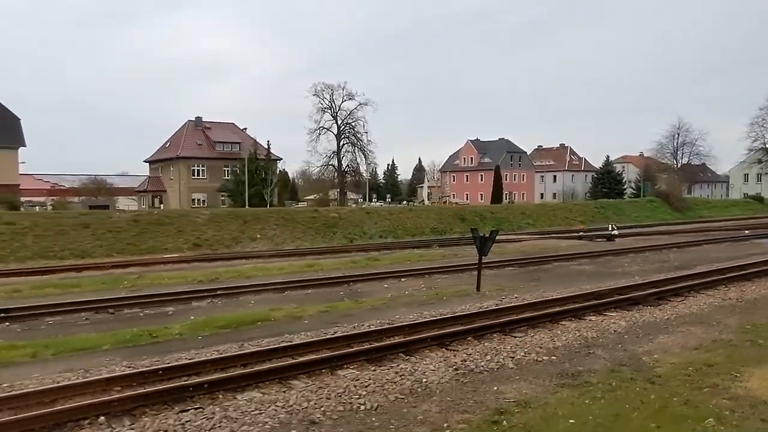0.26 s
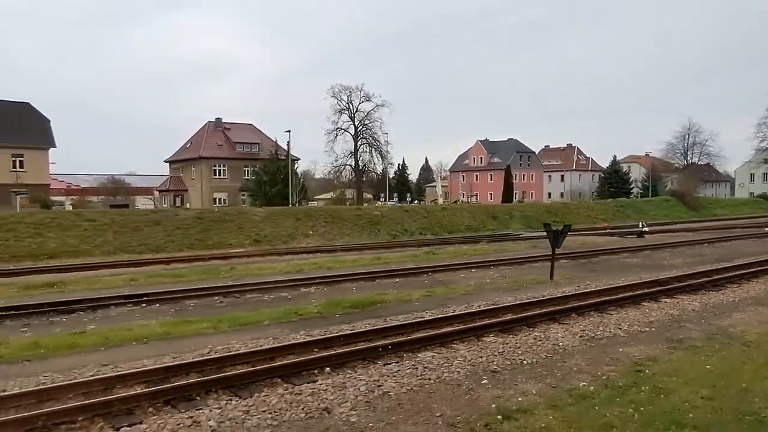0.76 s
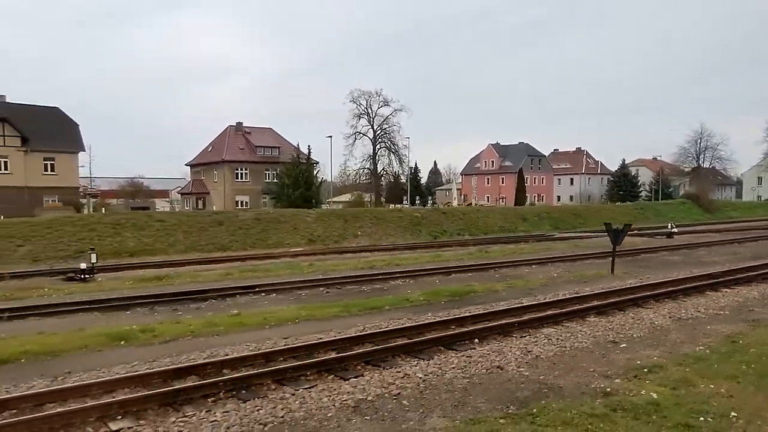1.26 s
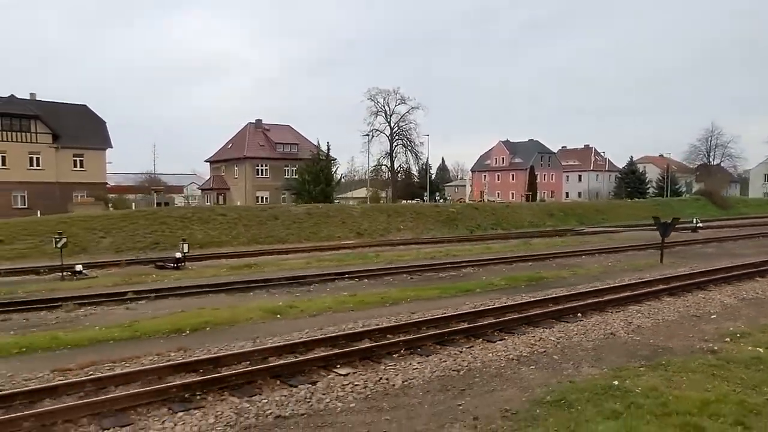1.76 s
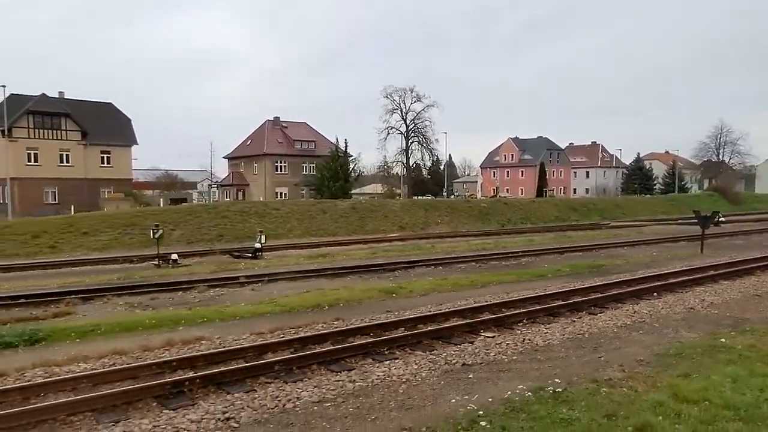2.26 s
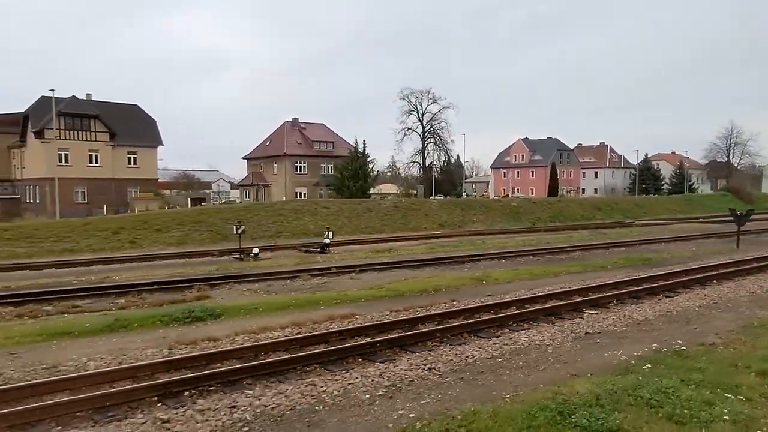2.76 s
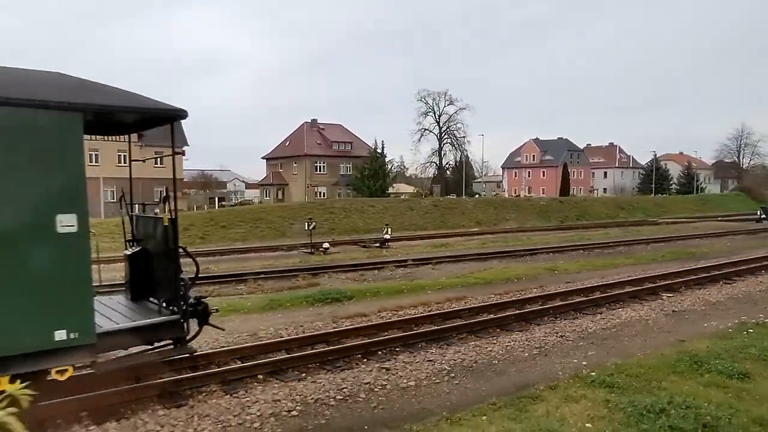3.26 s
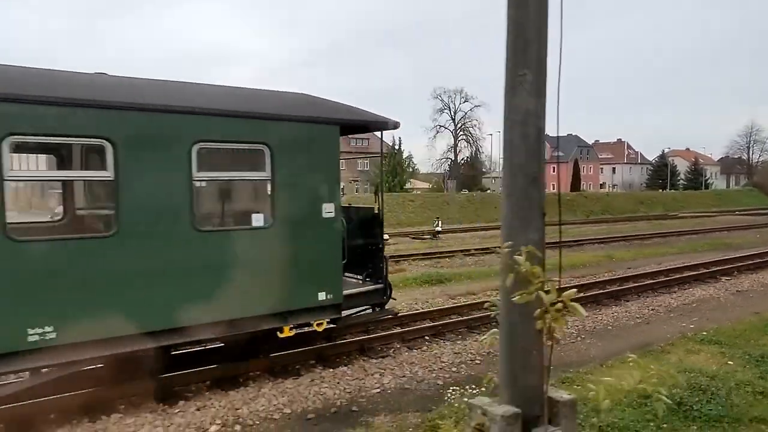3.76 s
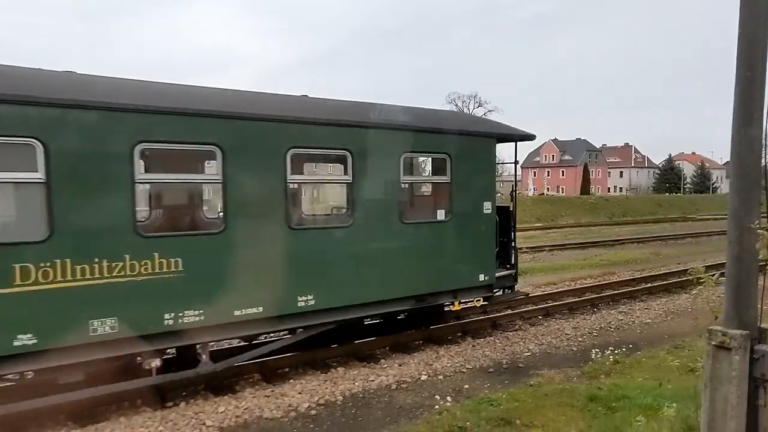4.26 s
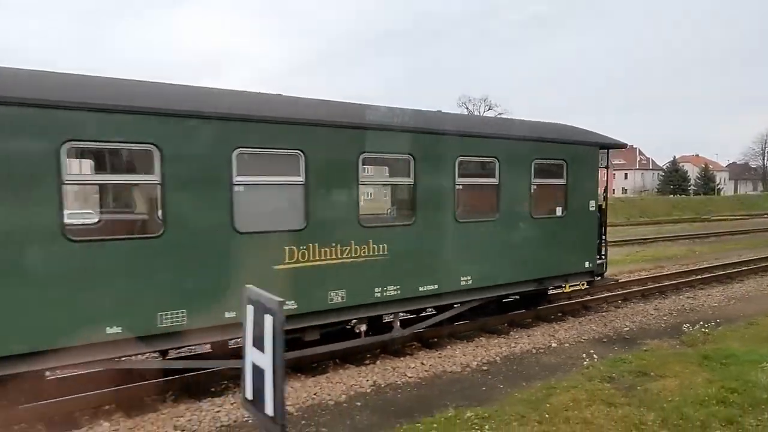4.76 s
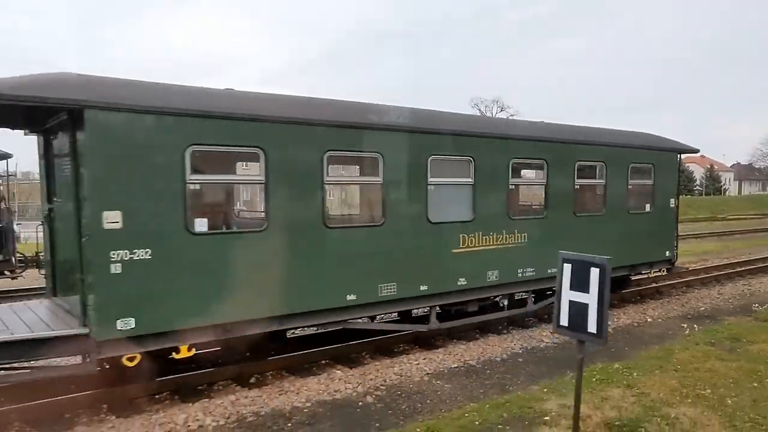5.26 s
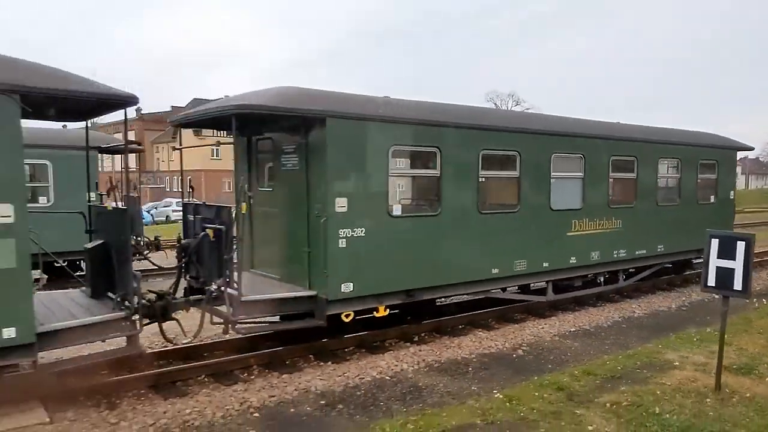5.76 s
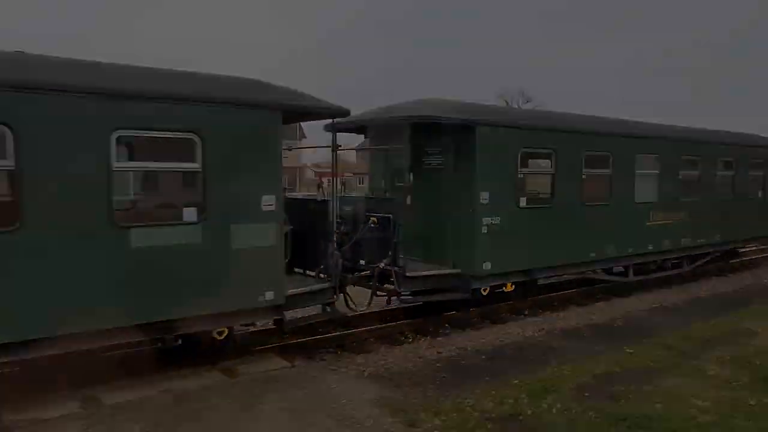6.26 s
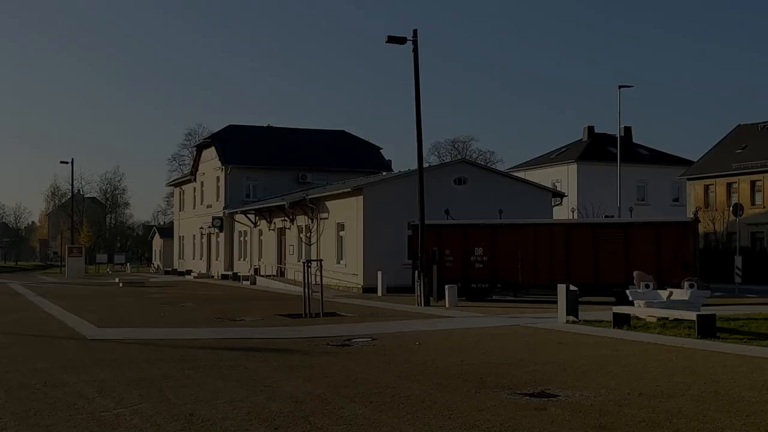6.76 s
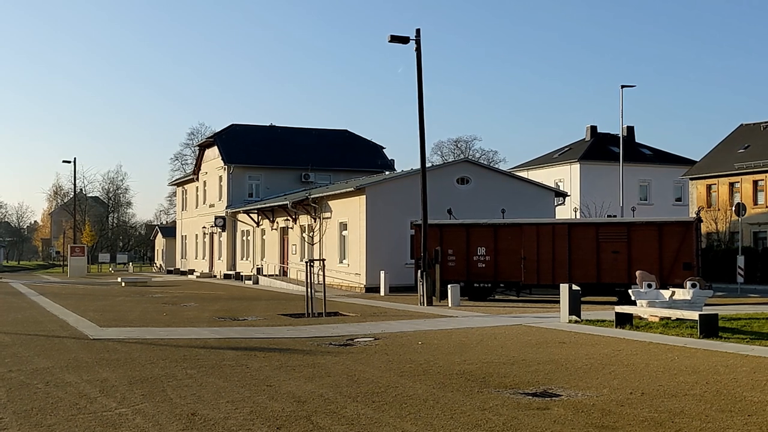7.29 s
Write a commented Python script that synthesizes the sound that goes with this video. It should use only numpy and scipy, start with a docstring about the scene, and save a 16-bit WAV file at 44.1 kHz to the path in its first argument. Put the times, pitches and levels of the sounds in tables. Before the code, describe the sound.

Inside a rolling diesel railcar, an uneven low boom and dull thuds mix with clacking rail joints, then fade into a quiet open square.

```python
"""A booming diesel railcar interior, rolling through a station: uneven low boom, thuds, rail joints clacking.
Boom and rolling are shaped noise; thuds are enveloped sine pairs with floor noise; gears whine as unsteady sines.
Joints ring decaying steel and panel modes, with noise bursts for clack, sizzle and floor knock.
At the end the ride fades out; a quiet open-air square with far traffic, rising underneath, remains."""
import sys
import numpy as np
from scipy.fft import rfft, irfft, next_fast_len
from scipy.io import wavfile
from scipy.ndimage import uniform_filter1d, map_coordinates

SR = 44100
rng = np.random.default_rng(int(sys.argv[2]) if len(sys.argv) > 2 else 0)


def unload_wav(signal):
    """Save mono or channel-first audio to the path in sys.argv[1] as 16-bit WAV at rate SR, clipped to [-1, 1]."""
    wavfile.write(
        sys.argv[1],
        SR,
        np.round(np.clip(np.atleast_2d(signal).T, -1, 1) * 32767).astype(np.int16),
    )


N = 332059


def amp(db):
    """Amplitude ratio of a level in dB."""
    return 10 ** (np.asarray(db) / 20)


def unit(x):
    """x scaled to rms 1."""
    return x / np.sqrt(np.mean(x ** 2) + 1e-20)


def along(points, hz):
    """Interpolate (frequency [Hz], value) points on a log-frequency axis."""
    f, v = np.transpose(points)
    return np.interp(np.log(hz + 1), np.log(f + 1), v)


def curves(rows):
    """One value per sample for each column after the time."""
    s, *cols = np.transpose(rows)
    return [np.interp(np.arange(N) / SR, s, c) for c in cols]


def wobble(knots_per_s):
    """A smooth random curve through normally distributed knots."""
    knots = rng.standard_normal(int(N * knots_per_s / SR) + 4)
    return map_coordinates(knots, [np.arange(N) * knots_per_s / SR])


def sine(hz):
    """Sine of a frequency that varies sample by sample."""
    return np.sin(2 * np.pi * np.cumsum(hz) / SR)


def ringing(hz, t):
    """Sine of steady frequency and random phase."""
    return np.sin(2 * np.pi * (hz * t + rng.random()))


def filtered(x, response):
    """x times a complex response of frequency."""
    m = next_fast_len(N + SR // 2)
    return irfft(rfft(x, m) * response(np.fft.rfftfreq(m, 1 / SR)), m)[..., :N]


def colour(points):
    """Gain response of a spectrum table."""
    return lambda hz: amp(along(points, hz))


def modes(table):
    """Gain response of a set of resonances, powers added."""
    def response(f):
        return np.sqrt(sum(amp(2 * db) * (f * width) ** 2 / ((hz * hz - f * f) ** 2 + (f * width) ** 2)
                           for hz, width, db in table))
    return response


# Left-right likeness of diffuse sound: (frequency [Hz], correlation [0-1])
LIKENESS = [(60, 1), (180, 0.97), (350, 0.83), (700, 0.21), (1400, 0.025), (4000, 0.18), (12000, 0.016)]


def rush(response):
    """Stereo noise of rms 1: near mono in the bass, partly alike above."""
    def mid_side(hz):
        turn = np.arccos(np.clip(along(LIKENESS, hz), -1, 1)) / 2
        return response(hz) * [np.cos(turn), np.sin(turn)]
    mid, side = filtered(rng.standard_normal((2, N)), mid_side)
    return unit(np.array([mid + side, mid - side]))


def blow(t, rise_s, t60_s):
    """Envelope that rises softly from t = 0 and dies away exponentially."""
    t = np.maximum(t, 0)
    return amp(-60 * t / t60_s) * (1 - np.exp(-(t / rise_s) ** 2))


# Body resonances, response applied twice: (frequency [Hz], single-pass width [Hz], single-pass level [dB])
LOW_BODY_MODES = [(45.7, 18, -21), (59.4, 7.8, -11.5), (80.9, 9.5, -3.5)]
# Same columns: (frequency [Hz], single-pass width [Hz], single-pass level [dB])
HIGH_BODY_MODES = [(129.2, 13, 0), (154.3, 38, -5)]
# Surging boom, before thuds and fade: (time [s], low boom level [dB], high boom level [dB])
BOOM_LEVELS = [(0, -32, -28.5), (.07, -27.5, -29.5), (.12, -28, -33.5), (.17, -28.5, -30), (.22, -45, -26),
               (.28, -35, -34.5), (.33, -26.5, -26), (.65, -28, -28), (.8, -28.5, -33.5),
               (.87, -29.5, -28.5), (1.1, -27.5, -28.5), (1.2, -33.5, -31.5), (1.28, -34.5, -26),
               (1.36, -36.5, -37.5), (1.42, -26, -24), (1.64, -28.5, -37), (1.79, -35.5, -31),
               (1.89, -29.5, -26), (1.95, -32, -39), (2.08, -25, -25), (2.17, -27, -32.5),
               (2.3, -25.5, -33), (2.42, -23.5, -21.5), (2.52, -31.5, -32.5), (2.7, -22, -24),
               (2.84, -30, -29.5), (2.91, -35.5, -37.5), (3.05, -26, -29.5), (3.13, -43, -31.5),
               (3.18, -33, -24), (3.26, -24, -35.5), (3.35, -35.5, -29.5), (3.55, -28, -30),
               (3.7, -26.5, -26), (3.78, -23.5, -39), (3.92, -20.5, -21.5), (4.06, -34.5, -33),
               (4.13, -27, -28.5), (4.33, -24.5, -27.5), (4.44, -42.5, -31.5), (4.59, -29, -30),
               (4.75, -24, -26.5), (4.95, -32, -26), (5.08, -25, -28.5), (5.23, -25, -30.5),
               (5.37, -25.5, -31), (5.5, -25.5, -29), (5.67, -36, -39), (5.75, -30.5, -29.5),
               (5.95, -22.5, -27.5), (6.2, -23, -31), (6.26, -28.5, -30), (6.32, -26, -35), (6.6, -31, -32),
               (6.9, -26, -27), (7.1, -32, -41)]
SWELL_DB, SWELLS_PER_S = 2.5, 18


def body_mode(table, level_db, steady):
    """Resonant noise heaving at random; the engine's drive evens out its own swells by the share steady."""
    hum = rush(lambda f: modes(table)(f) ** 2)
    swell = np.sqrt(np.abs(uniform_filter1d(hum.mean(0) ** 2, size=1500)) + .01)
    heave = unit(amp(SWELL_DB * wobble(SWELLS_PER_S)))
    return amp(level_db) * heave * unit(hum / swell ** steady)


def boom():
    """The body booms in a low and a high group of modes."""
    low_db, high_db = curves(BOOM_LEVELS)
    return body_mode(LOW_BODY_MODES, low_db, steady=1.0) + body_mode(HIGH_BODY_MODES, high_db, steady=0.54)


# Thuds of both body modes; levels scale the shape below:
# (time [s], low level [dB], low pitch [Hz], high level [dB], high pitch [Hz], length constant [s])
THUD_BLOWS = [(1.131, -14.5, 79, -14.5, 131, 0.033), (1.232, -24, 80, -26, 137.7, 0.093),
              (1.672, -25.5, 80, -20, 128.2, 0.057), (2.081, -30, 70, -15.5, 129.5, 0.034),
              (2.188, -19, 83.2, -35, 124, 0.11), (2.364, -19, 77, -12.5, 132, 0.035),
              (2.61, -18, 76.8, -24.5, 131.5, 0.1), (2.731, -14, 78.2, -18.5, 133.8, 0.043),
              (2.944, -14, 74.7, -20, 141, 0.041), (3.802, -21, 71.7, -16.5, 127.9, 0.14),
              (3.956, -17.5, 71.8, -28, 136.6, 0.067), (4.184, -18, 79, -10.5, 133.4, 0.063),
              (4.244, -20, 77.8, -26.5, 126.3, 0.097), (4.492, -20, 76.7, -25.5, 136.6, 0.072),
              (4.617, -11, 65.5, -7.5, 131.8, 0.056), (4.851, -16, 80.8, -33, 129.3, 0.073),
              (4.984, -13.5, 62, -10, 129, 0.054), (5.095, -10.5, 70.5, -19, 132, 0.038),
              (5.58, -16, 74.4, -29, 125, 0.05)]
# Floor knock spectrum: (frequency [Hz], relative density [dB per Hz])
KNOCK_SPECTRUM = [(130, -21.5), (185, 10.5), (230, 10), (320, -8), (550, -3.5), (900, -15.5), (1500, -59.5)]
THUD_RISE_S, THUD_EDGE = .025, 2.86  # edge: how abruptly a thud ends
THUD_SHAKE_DB = -16  # floor noise re high mode
TAKEOVER = 0.38  # share of the boom driven out at a thud's peak


def thuds():
    """Two body modes swell and drop away, alike in both channels, with stereo floor noise; also the boom's gain."""
    out, shake = np.zeros((2, N + SR))
    boom_gain = np.ones(N + SR)
    t = np.arange(SR // 2) / SR
    for s, low_db, low_hz, high_db, high_hz, length_s in THUD_BLOWS:
        shape = (1 - np.exp(-(t / THUD_RISE_S) ** 2)) * np.exp(-(t / length_s) ** THUD_EDGE)
        at = slice(round(s * SR), round(s * SR) + len(t))
        swing = amp(low_db) * ringing(low_hz, t) + amp(high_db) * ringing(high_hz, t)
        out[at] += np.sqrt(2) * shape * swing
        shake[at] += amp(high_db + THUD_SHAKE_DB) * shape
        boom_gain[at] *= 1 - TAKEOVER * shape / shape.max()
    return out[:N] + shake[:N] * rush(colour(KNOCK_SPECTRUM)), boom_gain[:N]


# Rolling spectrum before the cut below about 180 Hz: (frequency [Hz], relative density [dB per Hz])
ROLLING_SPECTRUM = [(15, -62.5), (25, -34.5), (36, -7.5), (69, 7.5), (132, 2.5), (199, -13.5), (431, -27.5),
                    (549, -24.5), (666, -32.5), (808, -23.5), (957, -40), (1370, -32.5), (1550, -42.5),
                    (4820, -49.5), (8000, -68), (10400, -106), (17600, -120)]
# Treble hiss spectrum: (frequency [Hz], relative density [dB per Hz])
HISS_SPECTRUM = [(2940, -37), (5000, -14), (7900, -15), (9610, -21), (10200, -28), (13900, -14.5),
                 (15600, -30)]
# Body panel resonances: (frequency [Hz], free-ringing width [Hz], relative level [dB])
PANEL_MODES = [(220.6, 2, -0.5), (254, 13, -15), (355.6, 5.6, -4), (425.2, 6.9, -6.5), (559, 5.7, -3.5),
               (817, 14, -5.5), (1217, 13, -17), (1436, 34, -12.5), (1900, 83, -11), (2290, 53, -14)]
# Nearly even rolling and a coming and going treble hiss, before wobble and fade:
# (time [s], rolling level [dB], treble hiss level [dB])
RIDE_LEVELS = [(0, -30.5, -102), (.7, -33, -71.5), (1.35, -31, -72.5), (1.6, -30.5, -94.5),
               (2.3, -30, -66.5), (3.05, -30, -62), (3.55, -30, -83), (4.1, -29.5, -75.5),
               (4.42, -28, -58.5), (4.9, -30, -65.5), (5.4, -29.5, -101), (6.0, -29.5, -91),
               (6.5, -28.5, -63), (7.1, -29.5, -59)]
PANEL_SMEAR_HZ = 14  # width added by shaking


def rolling():
    """Rough wheels on rough rail make noise and ring the panels; faint unsteady treble hiss lies over them."""
    roll_db, hiss_db = curves(RIDE_LEVELS)

    def bed_response(hz):
        bass_cut_db = -13 / (1 + (hz / 180) ** 6)  # leaves room for the boom
        return colour(ROLLING_SPECTRUM)(hz) * amp(bass_cut_db)
    out = rush(bed_response) * amp(roll_db + 1.45 * wobble(7))
    for hz, width_hz, db in PANEL_MODES:
        panel = rush(modes([(hz, width_hz + PANEL_SMEAR_HZ, db)]))
        out += panel * amp(roll_db - 19.5 + db + 7.0 * np.tanh(wobble(9)))
    unsteady_db = 8 * np.tanh(wobble(9)) + 3 * np.tanh(wobble(40))
    return out + rush(colour(HISS_SPECTRUM)) * amp(hiss_db + unsteady_db)


# Rail joints and rattles; levels before envelope and pan:
# (time [s], clack level [dB], sizzle level [dB], low ring level [dB], low ring centre [Hz],
#  high ring level [dB], high ring centre [Hz], knock level [dB], knock centre [Hz],
#  rise constant [s], t60 [s], left-right difference [dB])
JOINT_BLOWS = [(0.634, -45.5, -74, -51, 1840, -63, 5060, -46, 231, 0.0056, 0.5, 4.5),
               (0.9917, -46, -71.5, -45, 1900, -67, 5900, -39, 353, 0.0053, 0.38, 1.5),
               (1.628, -51, -57, -55.5, 3150, -59, 6250, -40, 240, 0.017, 0.66, -3.5),
               (1.6812, -39, -37, -34.5, 3180, -41.5, 5120, -25.5, 243, 0.0045, 0.24, 0),
               (1.699, -54, -54, -39.5, 2300, -53.5, 6230, -44, 560, 0.0037, 0.38, 2.5),
               (2.0007, -54, -85, -47.5, 2870, -80, 5260, -50, 506, 0.0042, 0.17, -6.5),
               (2.2442, -44.5, -44, -46.5, 3140, -54.5, 5170, -39.5, 231, 0.012, 0.65, 1),
               (2.3069, -40.5, -37, -34.5, 3450, -45, 6500, -28, 268, 0.0062, 0.24, -2),
               (2.398, -60, -43, -43, 3170, -50.5, 6800, -39, 258, 0.0041, 0.23, -0.5),
               (2.601, -37.5, -32.5, -35.5, 3190, -34, 5900, -27, 258, 0.016, 0.2, 0),
               (2.632, -45, -52.5, -44, 2300, -45, 6050, -44, 258, 0.006, 0.21, -2.5),
               (2.756, -45, -50, -54, 3130, -69, 5300, -33, 232, 0.0057, 0.36, 0.5),
               (2.776, -45, -44, -43, 1900, -43, 9030, -37, 234, 0.0081, 0.24, -2.5),
               (3.1455, -47, -73, -45, 1890, -61, 5100, -33.5, 365, 0.0015, 0.32, 2.5),
               (3.7881, -40, -69.5, -53, 2380, -55, 5350, -38, 360, 0.0036, 0.25, -2.5),
               (3.808, -47, -71.5, -56, 2270, -66, 5100, -34.5, 581, 0.0029, 0.34, -7),
               (4.052, -49, -58, -69, 2340, -67, 5350, -43, 228, 0.0067, 0.51, 0),
               (4.1614, -39.5, -58, -40, 2450, -52.5, 6600, -32.5, 585, 0.008, 0.31, -14.5),
               (4.598, -43, -70, -57.5, 2730, -67.5, 5330, -28, 541, 0.0059, 0.3, -1),
               (4.9746, -41, -66, -62.5, 2300, -55, 4940, -27.5, 433.5, 0.012, 0.35, -4),
               (5.6452, -50, -55.5, -57, 2100, -65, 5230, -40, 792, 0.0065, 0.46, -2.5),
               (6.485, -56, -59, -58.5, 2300, -68, 5120, -55, 560, 0.015, 0.7, -4)]
# Modes of wheel and frame: (nominal frequency [Hz], relative level [dB])
STEEL_MODES = [(1900, 1.5), (2300, -1.5), (2870, 1), (3150, 3.5), (3330, 1), (3450, 3.5), (5120, 6),
               (5930, -2.5), (6250, -2.5), (6600, 9), (8600, 1), (9070, 4), (9500, 1.5), (11900, 3),
               (13000, -4), (14000, -3)]
# Clack spectrum: (frequency [Hz], relative density [dB per Hz])
CLACK_SPECTRUM = [(530, -39), (900, 4.5), (2680, 1.5), (3420, -9.5), (3750, -1), (6410, -10), (8500, -18.5),
                  (11000, -43), (18700, -120)]
# Sizzle spectrum: (frequency [Hz], relative density [dB per Hz])
SIZZLE_SPECTRUM = [(3530, -21.5), (6000, -4.5), (7750, -9), (9660, -10.5), (10900, -12.5), (11900, -5),
                   (13800, -10), (15600, -12.5)]
FLOOR_DB, FLOOR_RISE_S, FLOOR_T60_S = 5, 0.0078, 0.11  # level re knock
PANELS_RING_DB = 8  # re knock
PANEL_DB_PER_OCTAVE, PANEL_FAR_DB = 19, 19  # loss away from the knock centre, and its limit
STEEL_DB_PER_OCTAVE, STEEL_FAR_DB = 75.5, 13.5  # loss away from the ring centre, and its limit
STEEL_SCATTER = .002  # relative detuning per blow, standard deviation


def distance_db(hz, centre_hz, db_per_octave, limit_db):
    """A mode weakens with its distance in pitch from the struck part."""
    return -min(limit_db, db_per_octave * abs(np.log2(hz / centre_hz)))


def panel_ring(t, knock_db, knock_hz, dying):
    """The low panels ring freely, dying as their width allows."""
    out = np.zeros((2, len(t)))
    for hz, width_hz, db in PANEL_MODES[:6]:
        near_db = distance_db(hz, knock_hz, PANEL_DB_PER_OCTAVE, PANEL_FAR_DB)
        swing = np.exp(-np.pi * width_hz * t) * dying
        out += amp(knock_db + PANELS_RING_DB + db + near_db) * swing * ringing(hz, t)
    return out


def steel_ring(t, low_db, low_hz, high_db, high_hz, dying):
    """Detuned steel modes ring, smeared by loose parts that keep exciting them."""
    out = np.zeros((2, len(t)))
    for hz, db in STEEL_MODES:
        rattle = .6 + .75 * unit(uniform_filter1d(rng.standard_normal((2, len(t))), size=120))
        ring_db, centre_hz = (low_db, low_hz) if hz < 4500 else (high_db, high_hz)
        near_db = distance_db(hz, centre_hz, STEEL_DB_PER_OCTAVE, STEEL_FAR_DB)
        detuned_hz = hz * rng.normal(1, STEEL_SCATTER)
        tone = np.sin(2 * np.pi * (detuned_hz * t + rng.random((2, 1))))
        out += amp(ring_db + db + near_db) * dying * rattle * tone
    return out


def joints():
    """Each blow rattles the steel, scatters a noisy clack through the car and knocks on the floor."""
    t = np.arange(SR // 3) / SR
    ring, clack, sizzle, knock = np.zeros((4, 2, N + SR))
    for (s, clack_db, sizzle_db, low_db, low_hz, high_db, high_hz,
         knock_db, knock_hz, rise_s, t60_s, pan_db) in JOINT_BLOWS:
        at = slice(round(s * SR), round(s * SR) + len(t))
        dying = amp([[pan_db / 2], [-pan_db / 2]]) * blow(t, rise_s, t60_s)
        clack[:, at] += amp(clack_db) * dying
        sizzle[:, at] += amp(sizzle_db) * dying
        knock[:, at] += amp(knock_db) * dying
        thump = blow(t, FLOOR_RISE_S, FLOOR_T60_S) * ringing(knock_hz, t)
        ring[:, at] += amp(knock_db + FLOOR_DB) * thump
        ring[:, at] += panel_ring(t, knock_db, knock_hz, dying)
        ring[:, at] += steel_ring(t, low_db, low_hz, high_db, high_hz, dying)
    return (ring[:, :N] + clack[:, :N] * rush(colour(CLACK_SPECTRUM))
            + sizzle[:, :N] * rush(colour(SIZZLE_SPECTRUM)) + knock[:, :N] * rush(colour(KNOCK_SPECTRUM)))


# Gear tones before wobble and fade: (mean frequency [Hz], level [dB], pitch waver [Hz])
GEAR_TONES = [(800, -51, 4), (2320, -64, 4)]


def whine():
    """Gear mesh tones, slightly unsteady in pitch and strength."""
    return sum(amp(db + 2.5 * wobble(18)) * sine(hz + waver_hz * wobble(10)) for hz, db, waver_hz in GEAR_TONES)


# One thin squeak: (start [s], end [s], starting pitch [Hz], starting level before envelope and chatter [dB])
SQUEAK_TONE = (2.48, 2.61, 3900, -59)


def squeak():
    """A short chattering tone, rising in pitch."""
    start_s, end_s, hz, db = SQUEAK_TONE
    since_s = np.arange(N) / SR - start_s
    chatter_db = 25 * since_s + 7 * np.tanh(2 * wobble(130))
    tone = sine(hz + 500 * since_s + 50 * wobble(220))
    envelope = np.sin(np.pi * np.clip(since_s / (end_s - start_s), 0, 1)) ** .5
    return amp(db + chatter_db) * tone * envelope


# Hiss bursts, level before envelope: (time [s], level [dB], t60 [s])
HISS_PUFFS = [(6.071, -55.5, 0.96), (6.4523, -54, 0.73)]
PUFF_RISE_S = 0.019


def puffs():
    """Short soft bursts of sizzle-coloured noise."""
    t = np.arange(N) / SR
    envelope = sum(amp(db) * blow(t - s, PUFF_RISE_S, t60_s) for s, db, t60_s in HISS_PUFFS)
    return envelope * rush(colour(SIZZLE_SPECTRUM))


# Far traffic spectrum: (frequency [Hz], relative density [dB per Hz])
SQUARE_SPECTRUM = [(15, -47), (25, -14), (64, 3.5), (349, -19), (523, -11), (631, -16.5), (1050, -14.5),
                   (1300, -11), (1450, -14), (1620, -15.5), (2400, -24.5), (4040, -35), (6210, -41),
                   (9050, -43), (15500, -44)]
# Fade-in of the square: (time [s], gain [ratio])
SQUARE_FADE_IN = [(0, 0), (6.1, 0.37), (7.1, 0.83), (7.6, 1)]


def square():
    """Far traffic over an open square: noise of gently wandering level."""
    return amp(-52 + wobble(7.2)) * curves(SQUARE_FADE_IN)[0] * rush(colour(SQUARE_SPECTRUM))


# Ride fade-out: (start [s], end [s])
RIDE_FADE = (5.94, 7.14)


def fade():
    """Gain of the ride: full, then falling evenly to nothing."""
    return np.interp(np.arange(N) / SR, RIDE_FADE, [1, 0])


def scene():
    """The fading ride, its blows and the square, summed."""
    thud, boom_gain = thuds()
    ride = boom_gain * boom() + rolling() + whine() + squeak()
    return fade() * ride + thud + joints() + puffs() + square()


# Colour difference of the microphones: (frequency [Hz], left-right difference [dB])
MIC_LEAN = [(60, 0), (180, 1.5), (550, 4.5), (1650, -4), (4970, 1.5), (15000, -2.5)]
LEFT_LAG_S = 0.000462  # reached well above 1500 Hz
TOP_HZ = 15790
CEILING, KNEE = 0.57, 3.7  # peak limit [full scale], knee exponent


def record(dry):
    """Two spaced microphones of unlike colour squash the tallest peaks; the band is limited."""
    def pair(hz):
        lag_phase = np.pi * hz * LEFT_LAG_S / (1 + (1500 / (hz + 1)) ** 4)
        left = amp(along(MIC_LEAN, hz) / 2) * np.exp(-1j * lag_phase)
        return np.array([left, 1 / left]) * (hz < TOP_HZ)
    squashed = dry / (1 + np.abs(dry / CEILING) ** KNEE) ** (1 / KNEE)
    onset = np.minimum(1, np.arange(N) / 100)  # 100-sample fade-in
    return filtered(squashed * onset, pair)


dry = scene()
out = record(dry)
unload_wav(out)
```